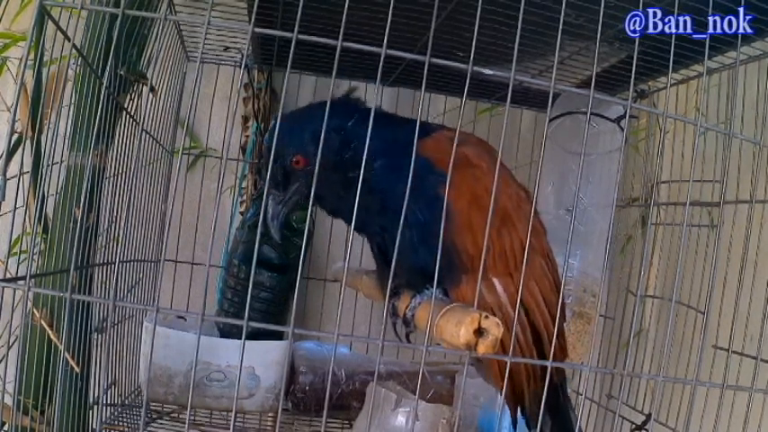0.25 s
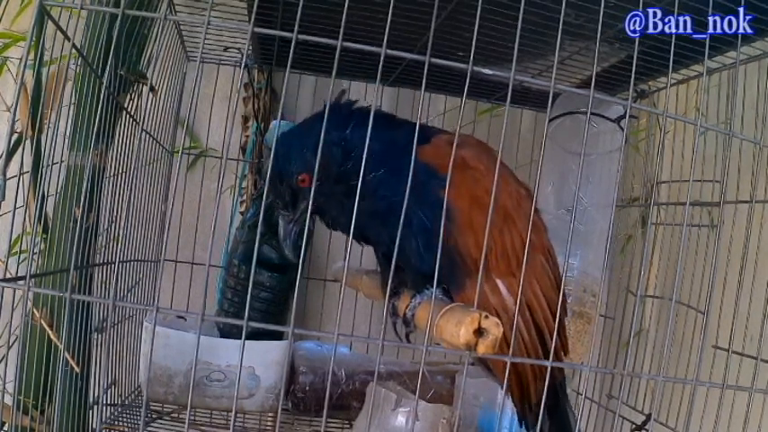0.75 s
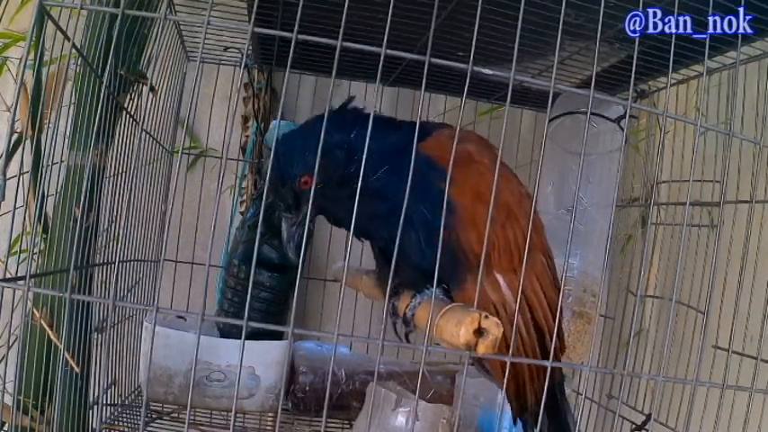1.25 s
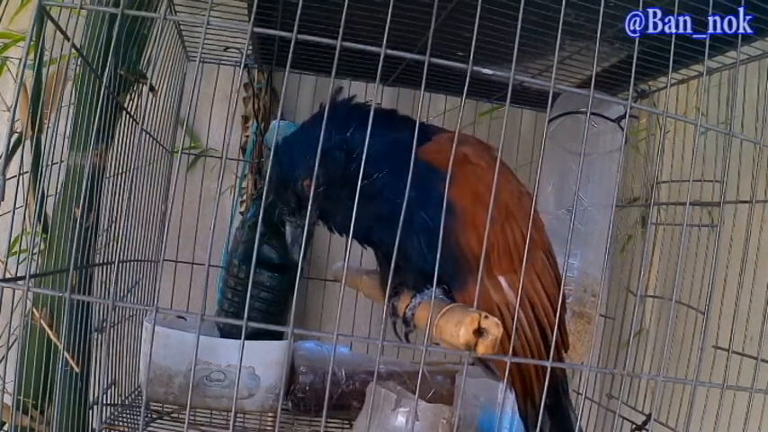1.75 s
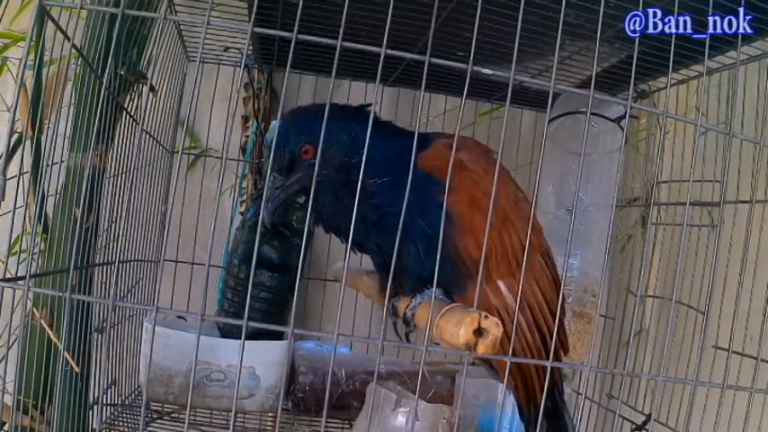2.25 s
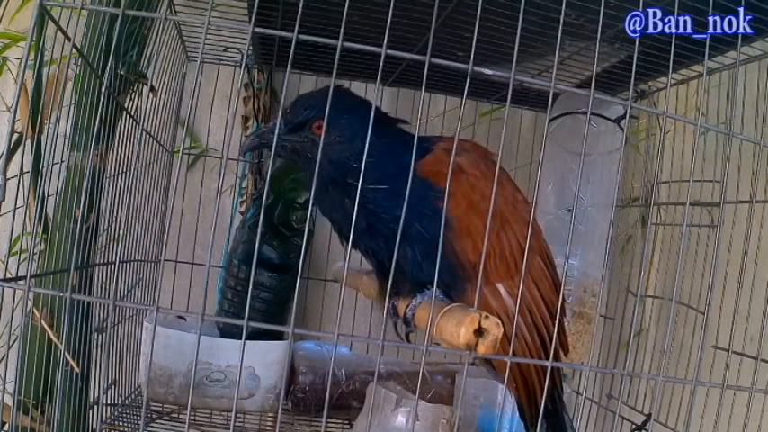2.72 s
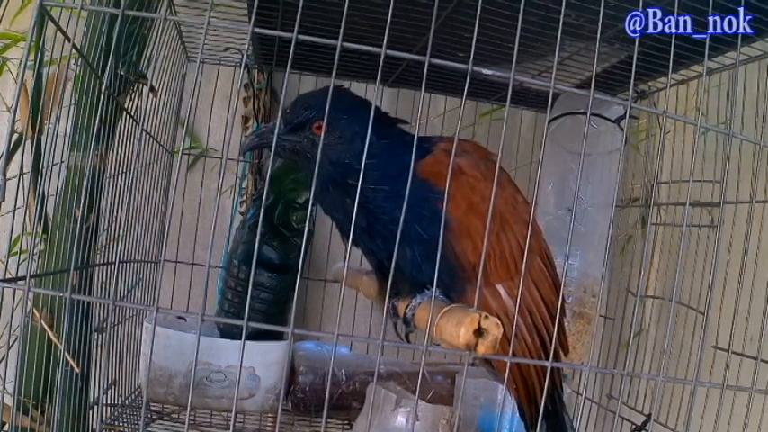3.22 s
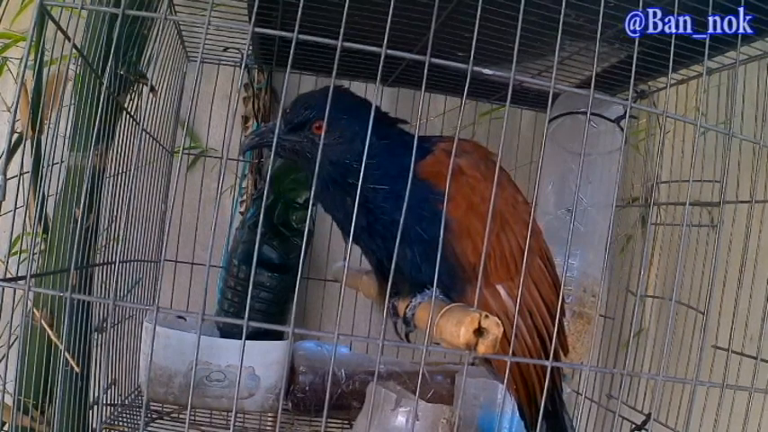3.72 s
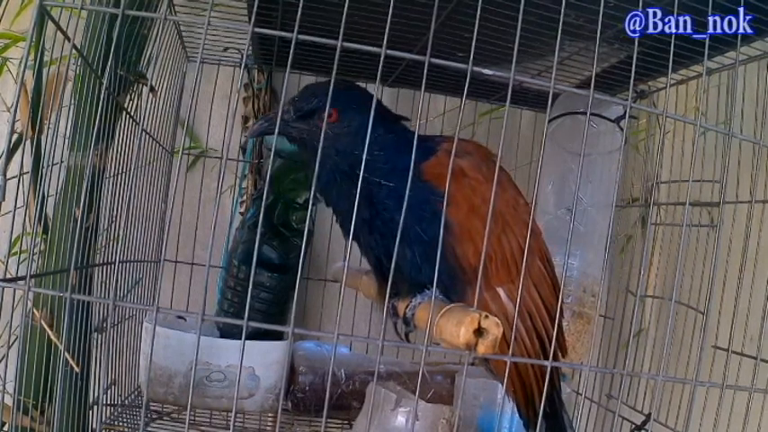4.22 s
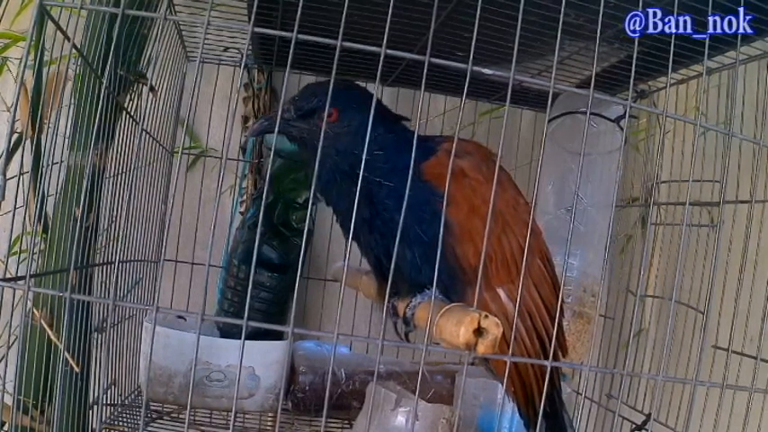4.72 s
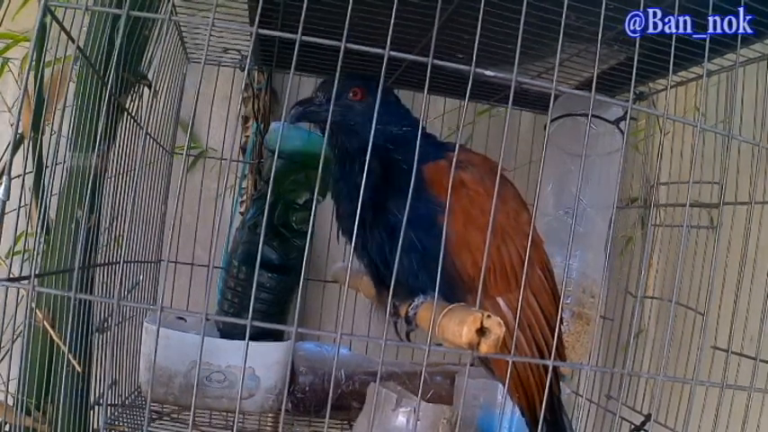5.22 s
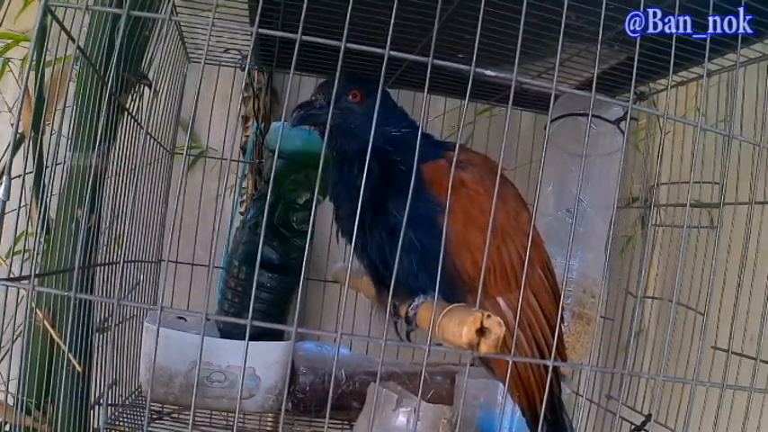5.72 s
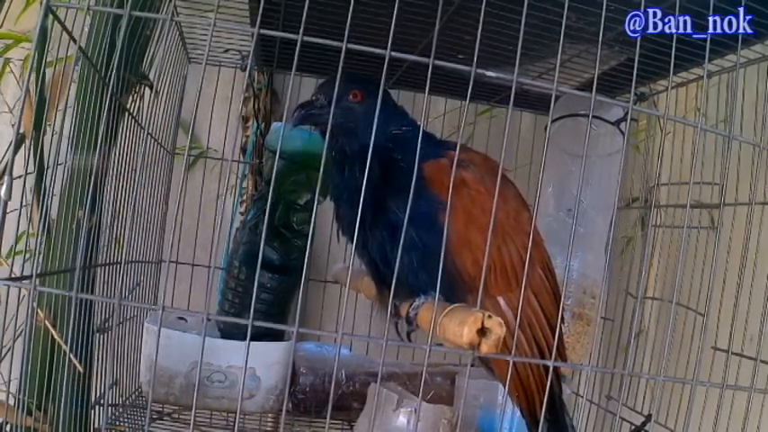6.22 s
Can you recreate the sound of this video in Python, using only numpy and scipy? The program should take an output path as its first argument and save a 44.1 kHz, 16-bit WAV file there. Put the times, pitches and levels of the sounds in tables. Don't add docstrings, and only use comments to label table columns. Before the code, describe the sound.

Smooth, nearly pure low hoots come first, very near and strong, about three per second and sinking slightly in pitch. Then the near bird falls silent and the quiet yard is exposed: far, reverberant chirps, a few sliding whistles, chirps again. A low hum rises faintly, feathers brush wire softly, and the cheap microphone adds hiss and tiny rapid high ticks.

```python
import sys
import numpy as np
from scipy import signal
from scipy.fft import rfft, irfft
from scipy.io import wavfile
from scipy.ndimage import uniform_filter1d

SR = 44100
rng = np.random.default_rng(int(sys.argv[2]) if len(sys.argv) > 2 else 0)


def invert_db(level):
    return 10 ** (np.asarray(level, dtype=float) / 20)


def generate_wav(signal):
    frames = np.transpose(np.atleast_2d(signal))
    scaled = np.clip(frames, -1, 1) * 32767
    pcm = np.round(scaled).astype(np.int16)
    wavfile.write(sys.argv[1], SR, pcm)


N = 284886


def evened(x):
    return x / np.sqrt(np.mean(x ** 2) + 1e-20)


def read(points, hz):
    f, value = np.transpose(points)
    return np.interp(np.log(hz + 1), np.log(f + 1), value)


def add(mix, s, sound):
    part = mix[round(s * SR):][:len(sound)]
    part += sound[:len(part)]


def coloured(points):
    hz = np.fft.rfftfreq(N, 1 / SR)
    spectrum = rfft(rng.standard_normal(N)) * invert_db(read(points, hz))
    return evened(irfft(spectrum, N))


def resonate(x, hz, width_hz):
    return signal.lfilter(*signal.iirpeak(hz, hz / width_hz, SR), x)


def drift(count, span, passes=1):
    x = rng.standard_normal(count)
    for _ in range(passes):
        x = uniform_filter1d(x, span)
    return evened(x)


def note(rows, smooth_s, shift_s=0, flutter=0):
    s, hz, db = np.transpose(rows)
    t = np.arange(s[0], s[-1], 1 / SR)
    span = max(round(smooth_s * SR), 1)
    wobble = 1 + flutter * drift(len(t), 60)
    pitch_hz = uniform_filter1d(np.interp(t, s, hz), span) * wobble
    phase = 2 * np.pi * np.cumsum(pitch_hz) / SR
    strength = np.sqrt(2) * uniform_filter1d(np.interp(t, s, invert_db(db)), span)
    return s[0] + shift_s, phase, strength


def echoes(x, t60, first_s, rise_s):
    taps, t = np.zeros(SR), np.arange(SR) / SR
    at = np.arange(0, SR - 20, 20)
    taps[at + rng.integers(0, 20, len(at))] = rng.choice([-1., 1.], len(at))
    late = np.maximum(t - first_s, 0)
    taps *= (1 - np.exp(-late / rise_s)) * invert_db(-60 * late / t60)
    return signal.fftconvolve(x, taps / np.linalg.norm(taps))[:N]


def yard():
    # frequency in Hz, level in dB per Hz.
    wash = [(12, -35.5), (20, -3), (22, -12.5), (44, -1), (106, -4), (126, -6.5), (140, -17.5), (171, -11),
            (282, -13), (324, -17.5), (440, -16), (2040, -30), (8420, -39), (10800, -38.5), (15500, -39)]
    # time in seconds, level in dB.
    rumble = [(0, -49.5), (1.2, -52), (1.8, -54), (2.5, -51), (4.2, -51.5), (4.999, -49.5), (6.2, -51),
              (6.46, -47.5)]
    frames, hz = N // 256 + 5, np.fft.rfftfreq(1024, 1 / SR)
    a, b, patches = rng.standard_normal((frames, 513, 3)).T
    patches = uniform_filter1d(patches, 10, 0)
    patches = evened(uniform_filter1d(patches, 12, 1))
    s, db = np.transpose(rumble)
    swell_db = np.interp(np.arange(frames) * 256 / SR, s, db - db.mean())
    bass_share = 1 / (1 + (hz[:, None] / 220) ** 2)
    level_db = read(wash, hz)[:, None] + 0.95 * patches + bass_share * swell_db
    z = (a + 1j * b) * invert_db(level_db)
    return invert_db(-47) * evened(signal.istft(z, nperseg=1024, noverlap=768)[1][:N])


def motor():
    # time in seconds, pitch in Hz, level in dB.
    hum = [
        (3.3, 114, -63),
        (4.4, 114.6, -57.5),
        (6.46, 114.6, -55.5),
    ]
    s, phase, strength = note(hum, 0.29)
    out = np.zeros(N)
    waver = 1 + 0.305 * drift(len(phase), 4000)
    add(out, s, strength * np.sin(phase) * waver)
    return out


def insect():
    # middle of the rasp in seconds, level in dB.
    rasps = [(.66, -70), (1.748, -68), (2.77, -70), (3.799, -70), (4.85, -74.5), (5.98, -69.5)]
    t = np.arange(N) / SR
    swell = sum(invert_db(db) * np.exp(-((t - s) / 0.086) ** 2) for s, db in rasps)
    rasp = resonate(rng.standard_normal(N), 11000, 2000)
    return swell * evened(resonate(rasp, 11000, 2000))


def rustles():
    # middle of the puff in seconds, level in dB, centre in Hz.
    puffs = [
        (4.775, -68, 9000),
        (5.18, -66, 5800),
    ]
    t, out = np.arange(N) / SR, np.zeros(N)
    for s, db, hz in puffs:
        puff = evened(resonate(rng.standard_normal(N), hz, .4 * hz))
        out += invert_db(db) * np.exp(-((t - s) / 0.015) ** 2) * puff
    return out


def far_bird(notes, near_db, wet_db, t60, slap_s, slap_db):
    voice = np.zeros(N)
    for rows, shift_s, db, flutter in notes:
        s, phase, strength = note(rows, .003, shift_s, flutter)
        add(voice, s, invert_db(db) * strength * np.sin(phase) * signal.windows.tukey(len(phase), .08))
    heard = voice + invert_db(slap_db) * np.roll(voice, round(slap_s * SR))
    near = invert_db(near_db) * echoes(heard, t60=0.24, first_s=0.0032, rise_s=0.0078)
    return heard + near + invert_db(wet_db) * echoes(heard, t60, first_s=0.037, rise_s=0.04)


def slur(start, length, from_hz, to_hz, db):
    u = np.linspace(0, 1, num=12)
    hz = to_hz + (from_hz - to_hz) * (1 - u) ** 1.5
    arch_db = -18 * np.interp(u, [0, 0.56, 1], [.35, 0, 1]) ** 2
    return np.transpose([start + length * u, hz, db + arch_db])


def chirping_bird():
    # seconds after the song starts, length in seconds, from Hz, to Hz, level in dB.
    song = [(0, .058, 2520, 4283, -54.5), (.045, .06, 4380, 4600, -59.5), (0.027, .1, 3450, 3950, -55.5),
            (.184, .022, 2623, 2824, -47), (.223, .046, 3220, 2860, -46.5), (.275, .035, 3300, 3554, -55.5),
            (.305, .03, 3604, 3460, -49.5), (0.338, .04, 3200, 2858, -48)]
    hoarse = [.06, .035, .06, .065, .055, .035, .025, .02]
    # start in seconds, level in dB.
    song_starts = [
        (2.189, 0.5),
        (5.108, -0.5),
    ]
    chirps = []
    for s, db in song_starts:
        for row, flutter in zip(song, hoarse):
            chirps.append((slur(*row), s, db, flutter))
    return far_bird(chirps, near_db=-2.7, wet_db=-8.5, t60=0.85, slap_s=0.11, slap_db=-13.5)


def whistle(start, length, from_hz, to_hz, db):
    glide_s, land_db = .058, -1.5
    hold = length - glide_s
    landed = start + glide_s
    top_hz = to_hz * (1 + 1.15 * hold ** 2)
    first_db = 1 if from_hz > to_hz else -15
    return [(start, from_hz, db + first_db),
            (start + 0.313 * glide_s, .68 * from_hz + .32 * to_hz, db + first_db),
            (start + .6 * glide_s, 0.27 * from_hz + 0.72 * to_hz, db - 14),
            (landed, to_hz, db + land_db),
            (landed + 0.545 * hold, to_hz, db),
            (landed + .85 * hold, top_hz, db + land_db),
            (start + length, top_hz * (1 - 0.082), db - 9)]


def whistling_bird():
    # start in seconds, length in seconds, from Hz, to Hz, level in dB.
    calls = [
        (3.037, 0.14, 1394, 1622, -39),
        (3.33, .278, 2240, 1879, -42),
        (3.608, 0.078, 1740, 1028, -45.5),
    ]
    whistles = [(whistle(*row), 0, -2, .007) for row in calls]
    return far_bird(whistles, near_db=-2.5, wet_db=-9, t60=1.05, slap_s=0.037, slap_db=-8)


def hoot(start, length, pitch_hz, effort_db, push, held_db):
    # share of the length, strongest level in dB.
    throat = [(0, -52), (.1, -17.9), (.26, -7.7), (.4, -1.3), (.6, -.3), (.73, -6.5), (.9, -17), (.98, -32),
              (1.03, -56)]
    share, cap_db = np.transpose(throat)
    over_hz = .92 * (pitch_hz - 280.4)
    turns = [0, .085, .25, .4, .857, 0.96, 1]
    bend_hz = [-30, over_hz, .16 * over_hz, 0, 21.8, -.4, 6.]
    u = np.linspace(0, share[-1], num=80)
    push_share, knee = 0.22, 5.
    held = np.interp(u, [push - push_share, push + push_share], [1, 0])
    effort = invert_db(effort_db + held_db * held)
    cap = np.interp(u, share, invert_db(cap_db))
    db = -20 / knee * np.log10(effort ** -knee + cap ** -knee)
    return np.transpose([start + length * u, pitch_hz + np.interp(u, turns, bend_hz), db])


def coucal():
    # start in seconds, length in seconds, pitch in Hz, full effort in dB.
    hoots = [
        (-.114, .218, 307, -8),
        (.236, .196, 308.9, -7.1),
        (.566, .206, 305.3, -6.8),
        (.909, .213, 301.6, -7),
        (1.267, .214, 298.2, -7.3),
        (1.654, .206, 292.5, -10.2),
    ]
    # share of the length, held back before it in dB.
    pushes = [
        (.3, -3),
        (.224, -8.5),
        (.25, 1),
        (0.31, -1.1),
        (0.3, -1.4),
        (.54, -2.6),
    ]
    # multiple of the pitch, level in dB.
    overtones = [(2, -41.5), (3, -50.5), (4, -56.5)]
    # frequency in Hz, level in dB.
    air_shape = [(30, -5.5), (140, 0.5), (450, 0), (700, -5.5), (850, -16), (1100, -17), (1400, -19),
                 (1600, -29), (3000, -42.5), (6000, -55)]
    tone, airflow = np.zeros(N), np.zeros(N)
    for row, push in zip(hoots, pushes):
        s, phase, strength = note(hoot(*row, *push), 0.0044)
        past = max(round(-s * SR), 0)
        s, strength = max(s, 0), strength[past:]
        phase = phase[past:] - phase[past] + 3.36
        strength = strength * (1 + 0.022 * drift(len(phase), 400, passes=2))
        rich = np.sin(phase) + sum(invert_db(db) * np.sin(k * phase) for k, db in overtones)
        add(tone, s, strength * rich)
        add(airflow, s, invert_db(-30) * strength ** 0.96)
    voice = tone + airflow * coloured(air_shape)
    far_walls = echoes(voice, t60=1.4, first_s=.05, rise_s=.05)
    return voice + invert_db(-41) * far_walls


def scene():
    background = yard() + motor() + insect() + rustles()
    far_birds = whistling_bird() + chirping_bird()
    return (background + far_birds + coucal())[None]


def camera_ticks():
    # first tick in seconds, end of the run in seconds.
    tick_runs = [
        (.0325, 4.8),
        (4.8587, 6.46),
    ]
    out, t = np.zeros(N), np.arange(200) / SR
    times = np.concatenate([np.arange(first, last, 1 / 15) for first, last in tick_runs])
    for s, (size, pitch) in zip(times, rng.standard_normal((len(times), 2))):
        ring = np.sin(2 * np.pi * (10780 + 80 * pitch) * t)
        ring *= np.exp(-((t - .0015) / .0007) ** 2)
        add(out, s - .0015, invert_db(-55 + 1.5 * size) * ring)
    return out


def band_limit(x):
    return signal.sosfilt(signal.butter(12, 15690, fs=SR, output="sos"), x)


def record(dry):
    offset = .005
    return band_limit(dry + camera_ticks() + offset)


dry = scene()
out = record(dry)
generate_wav(out)
```